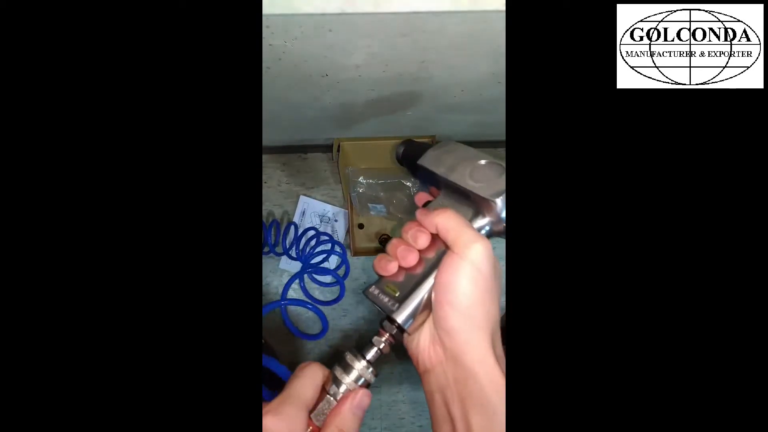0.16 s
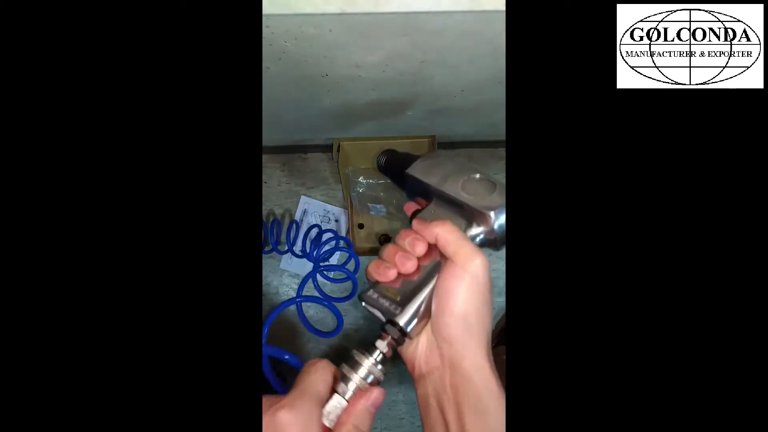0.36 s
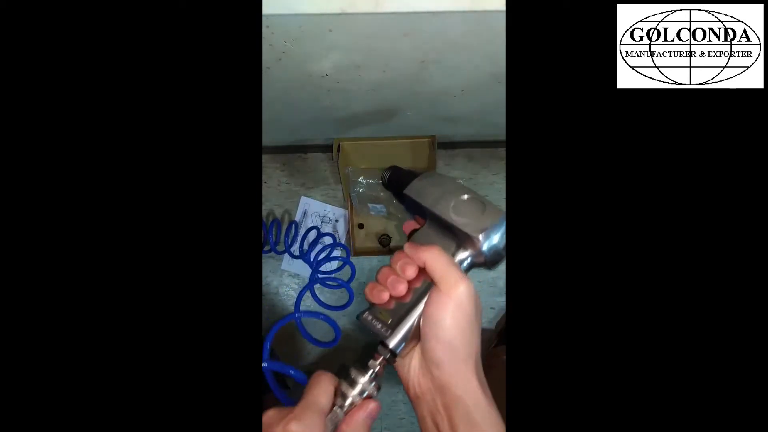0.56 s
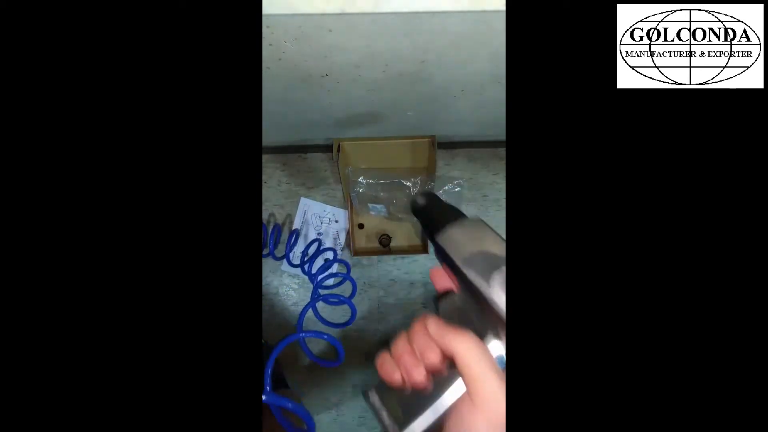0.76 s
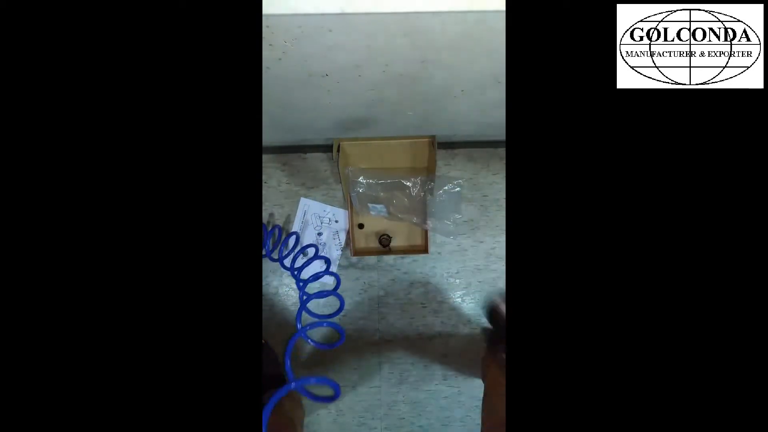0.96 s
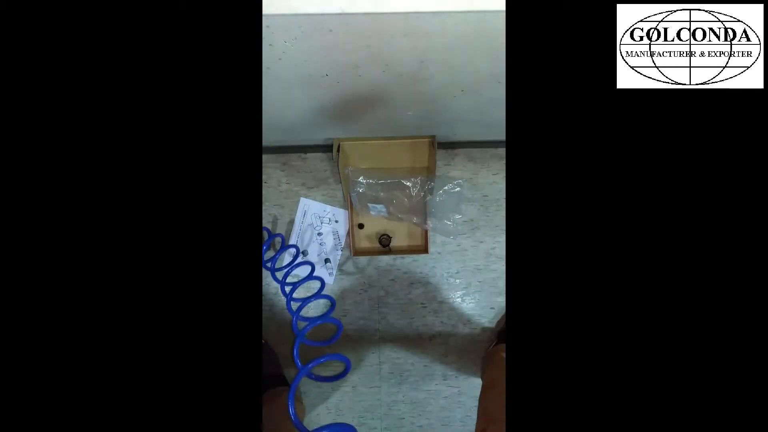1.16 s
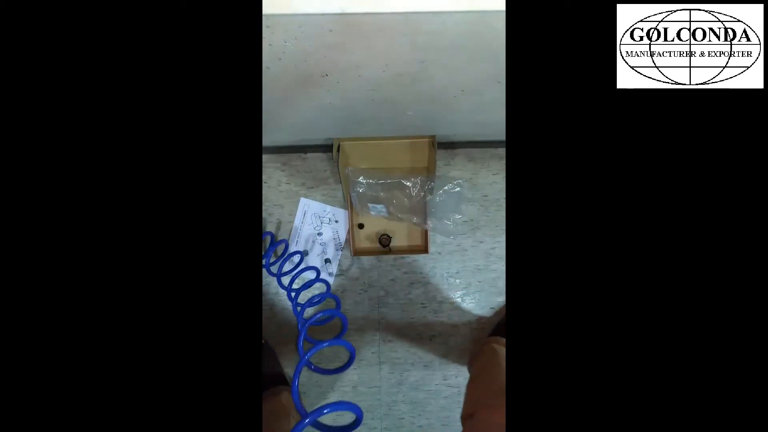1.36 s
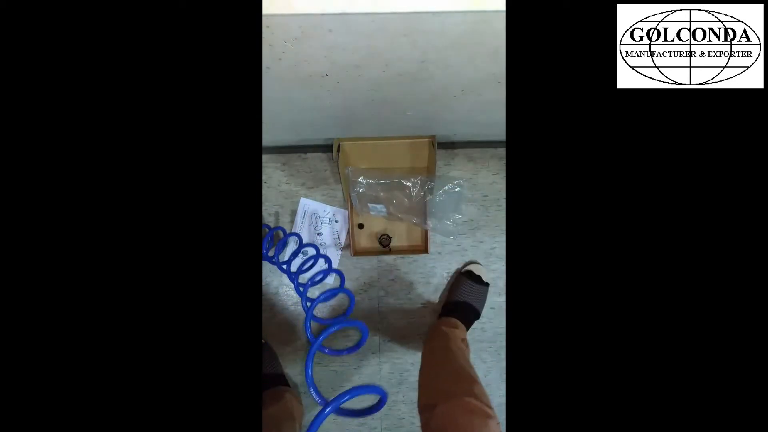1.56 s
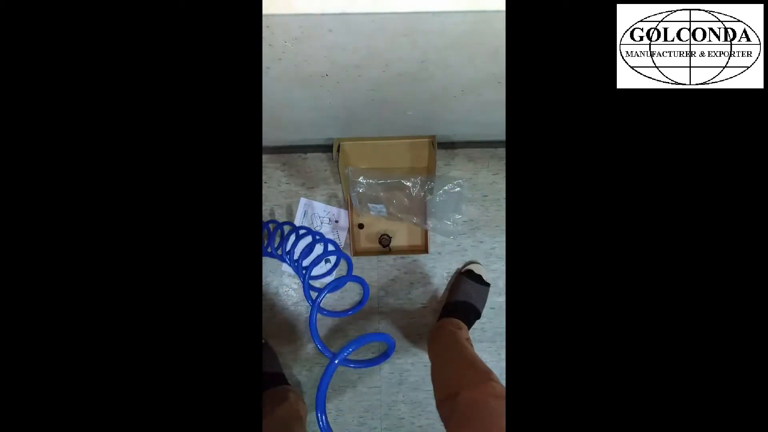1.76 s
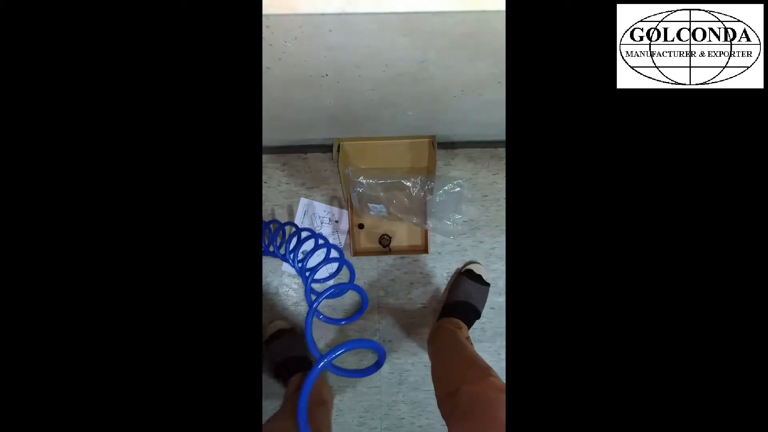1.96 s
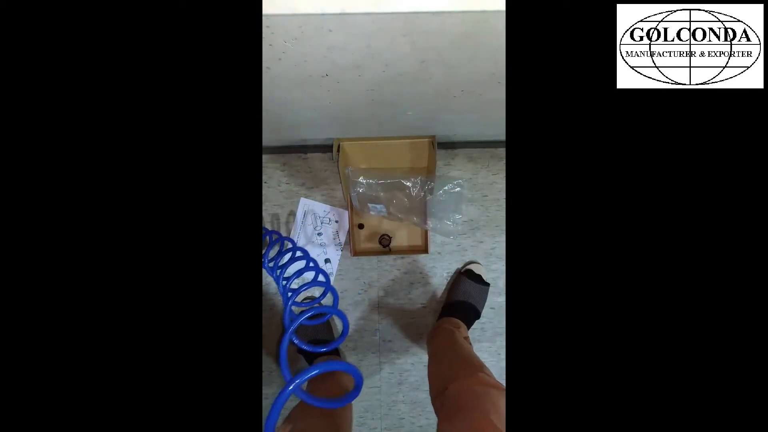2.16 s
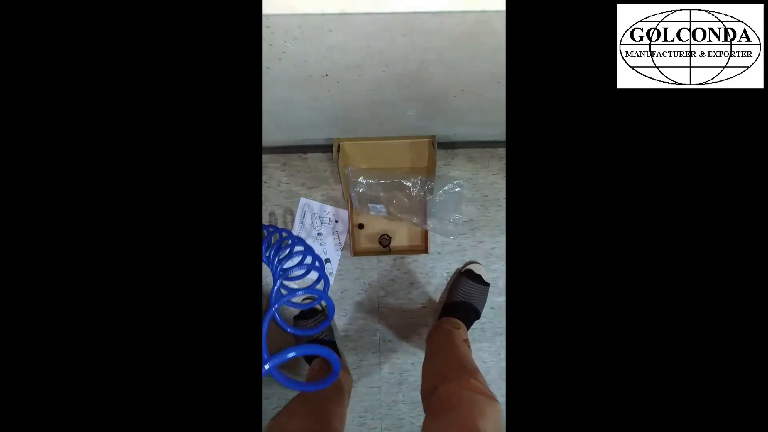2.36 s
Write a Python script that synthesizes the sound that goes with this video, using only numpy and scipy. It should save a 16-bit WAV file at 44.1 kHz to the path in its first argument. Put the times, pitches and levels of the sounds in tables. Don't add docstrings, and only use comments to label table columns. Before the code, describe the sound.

A short, harsh blast of compressed air escapes, cuts off, then tool knocks and light rattles

```python
import sys
import numpy as np
from scipy import signal
from scipy.fft import rfft, irfft, next_fast_len
from scipy.io import wavfile
from scipy.ndimage import uniform_filter1d, map_coordinates

SR = 44100
rng = np.random.default_rng(int(sys.argv[2]) if len(sys.argv) > 2 else 0)


def master(y):
    cut = np.clip(np.atleast_2d(y).T, -1, 1)
    pcm = np.round(cut * 32767)
    wavfile.write(sys.argv[1], SR, pcm.astype(np.int16))


def gain_from_decibels(decibels):
    exponent = np.asarray(decibels, float) / 20
    return 10 ** exponent


N = 105840
T = np.arange(N) / SR

# (time [s], left level [dB], right level [dB])
JET_FLOW = [
    (.205, -75, -94),
    (.216, -56, -30),
    (.237, -35, -19),
    (.252, -53, -12),
    (.3, -38, -16),
    (.341, -24, -13.5),
    (.349, -16.5, -30),
    (.385, -40, -42),
    (.52, -77, -61),
]
# (frequency [Hz], level [dB])
JET_COLOUR = [(300, -9), (1200, -17.5), (3000, -5), (5000, -4.5), (8200, 2), (10000, -1.5), (14000, 2.5),
              (16000, -9.5)]
# (frequency [Hz], gain [dB])
JET_SHADOW = [(300, -18), (1000, -12), (3000, -2.5), (6000, 6), (7500, -25), (14000, -14)]
# (time [s], level [dB])
PORT_WIND = [
    (.225, -58),
    (.25, -44),
    (.266, -15),
    (.3, -9.5),
    (.339, -11.5),
    (.343, -45),
]
# (frequency [Hz], level [dB])
BUFFET_COLOUR = [(25, 7), (90, -12), (250, -2.5), (550, 0), (1200, -6), (2500, -10), (5000, -8.5),
                 (9000, -14.5)]
# (time [s], frequency [Hz], decay t60 [s], left level [dB], right level [dB])
PRESSURE_SURGES = [
    (.2635, 97, 0.19, -60, -13),
    (.2655, 201, 0.24, -64, -15),
    (.3418, 58, 0.1, -41, -6),
    (.3385, 98, 0.064, -21.5, -45),
]
# (time [s], left level [dB], right level [dB])
LEAK_FLOW = [
    (.3, -99, -96),
    (.36, -68, -36),
    (.6, -82, -50),
    (1.1, -59, -44.5),
    (1.7, -49, -45.5),
    (2.45, -46, -43),
]
# (frequency [Hz], level [dB])
LEAK_COLOUR = [(1500, -22), (3000, -13.5), (5000, -9.5), (10000, -7), (12500, -8), (14200, -2),
               (15500, -3.5)]
# (time [s], left level [dB], right level [dB], brightness [dB per octave], hollow tone [dB])
TOOL_KNOCKS = [
    (.4052, -34, -17, 3.5, -13),
    (.42, -46, -38, -1, -10),
    (.621, -15, -9.5, -1, -0.5),
    (2.3489, -25.5, -23, -1, -16.5),
    (2.3633, -32, -34, -4, -12),
]
# (delay [s], level [dB])
KNOCK_CHATTER = [(0, -2), (.0004, -13), (.0011, -9), (.0017, -12), (.0027, -20.5)]
# (frequency [Hz], width [Hz], level [dB])
TOOL_BODY = [(890, 400, 0), (1905, 1090, -2), (3080, 1200, -0.5), (6560, 780, -1.5), (8280, 1140, -3),
             (10700, 1400, -5), (15200, 2100, -3.5)]
# (frequency [Hz], level [dB], decay t60 [s])
STEEL_MODES = [(3575, -12, 0.044), (4276, 1.5, 0.14), (4350, -10.5, 0.16), (6850, -31, 0.057),
               (9900, -14.5, 0.085)]
# (centre time [s], half length [s], left level [dB], right level [dB])
SCUFFS = [
    (.005, 0.055, -52, -53.5),
    (1.4, 0.035, -51, -46.5),
    (1.509, 0.051, -47, -42),
    (1.847, 0.041, -47, -43.5),
    (2.072, 0.039, -52.5, -47),
]
# (frequency [Hz], level [dB])
GRIT_COLOUR = [(1200, -12), (2000, -8), (2800, 0), (4500, -3.5), (7000, -2), (10000, -6.5), (14000, -32)]
# (start time [s], length [s], thud level [dB], creak level [dB])
SANDAL_STEPS = [
    (1.542, .007, -27, -37.5),
    (1.58, 0.013, -50, -42),
    (1.616, .03, -40, -46.5),
    (1.647, 0.03, -42, -67),
]
# (frequency [Hz], width [Hz], level [dB])
SOLE_BODY = [(161, 59, 0), (303, 170, -2)]
# (frequency [Hz], width [Hz], level [dB])
STRAP_BODY = [(1190, 280, 0)]
# (frequency [Hz], t60 [s])
ROOM_DECAY = [(200, 0.28), (2000, 0.28), (7000, 0.47), (14000, .25)]
# (frequency [Hz], density [dB per Hz])
RUMBLE_LEFT = [(30, -87), (60, -70), (120, -70.5), (230, -76), (450, -85.5), (800, -84), (2000, -97.5),
               (12000, -104)]
# (frequency [Hz], density [dB per Hz])
RUMBLE_RIGHT = [(30, -96), (60, -73.5), (120, -74), (230, -77.5), (450, -83.5), (800, -85.5), (2000, -95.5),
                (12000, -111), (16000, -116)]
# (frequency [Hz], correlation [0 to 1])
RUMBLE_ALIKE = [(60, 0.82), (300, 0.91), (640, 0.37), (1400, 0.11), (3000, .01)]
# (frequency [Hz], width [Hz], level [dB])
MACHINE_HUM = [(681.3, 2.6, -68.5), (706, 5.4, -67)]
# (frequency [Hz], shift [standard deviations])
GAP_LEFT_SHIFT = [(4000, .6), (8000, .1), (10000, -.9), (12000, .1), (14500, .1), (15500, -1.5)]
# (frequency [Hz], gain [dB])
LEFT_MIC = [(7500, 0.5), (8800, -5.5), (10000, -24), (11500, -6.5), (14000, -8), (15300, -28), (15900, -46)]


def unit(x):
    return x / np.sqrt(np.mean(x ** 2, axis=-1, keepdims=True) + 1e-20)


def along(points, hz):
    f, v = np.transpose(points)
    return np.interp(np.log(hz + 1), np.log(f + 1), v)


def gains(rows):
    s, *columns = np.transpose(rows)
    return gain_from_decibels(np.array([np.interp(T, s, c, left=-150, right=-150) for c in columns]))


def wobble(rate):
    return map_coordinates(rng.standard_normal(int(N * rate / SR) + 4), [T * rate])


def filtered(x, response):
    m = next_fast_len(N + SR // 2)
    return irfft(rfft(x, m) * response(np.fft.rfftfreq(m, 1 / SR)), m)[..., :N]


def noise(colour, channels=2):
    white = rng.standard_normal((channels, N))
    return unit(filtered(white, lambda hz: gain_from_decibels(along([(19, -86)] + colour, hz))))


def body(peaks):
    def response(f):
        total = 0
        for k, (centre, width, db) in enumerate(peaks):
            damping = 1j * f * width
            total = total + (-1) ** k * gain_from_decibels(db) * damping / (centre * centre - f * f + damping)
        return total
    return response


def after(s, t60):
    return (T >= s) * gain_from_decibels(-60 * np.abs(T - s) / t60)


def jet():
    hiss = noise(JET_COLOUR) * gain_from_decibels(0.95 * wobble(120.9))
    hiss[0] = filtered(hiss[0], lambda hz: gain_from_decibels(along(JET_SHADOW, hz)))
    throat_hz, throat_width_hz, whistle_db = 1287, 15.5, -10.5
    throat = body([(throat_hz, throat_width_hz, 0)])
    whistle = unit(filtered(rng.standard_normal(N), throat))
    flow = gains(JET_FLOW)
    return flow * hiss + gain_from_decibels(whistle_db) * flow[0] * whistle


def buffet():
    slaps_per_s, slap_db, left_db = 700, 6, -34
    slaps = noise(BUFFET_COLOUR, channels=1)[0] * gain_from_decibels(slap_db * wobble(slaps_per_s))
    return unit(slaps) * gains(PORT_WIND)[0] * gain_from_decibels([[left_db], [0]])


def valve_slam():
    sag_s, sag_turns = 0.003, 0.11
    out = np.zeros((2, N))
    for s, hz, t60, left_db, right_db in PRESSURE_SURGES:
        sag = sag_turns * (1 - np.exp(-np.abs(T - s) / sag_s))
        ring = after(s, t60) * np.sin(2 * np.pi * (hz * (T - s) + sag))
        out += gain_from_decibels([[left_db], [right_db]]) * [[1], [-1]] * ring
    return out


def leak():
    return gains(LEAK_FLOW) * noise(LEAK_COLOUR) * gain_from_decibels(.8 * wobble(6.09))


def knocks():
    rattle_s, rattle_db = 0.16, -33.5
    crack_s, crack_db = .012, 22
    left_lag_s, left_extra_tilt_db = .0007, 1
    out = np.zeros((2, N))
    for s, left_db, right_db, tilt_db, hollow_db in TOOL_KNOCKS:
        rattle = after(s, rattle_s) + gain_from_decibels(crack_db) * after(s, crack_s)
        blow = gain_from_decibels(rattle_db) * rng.standard_normal((2, N)) * rattle
        signs = rng.choice([-1, 1], size=len(KNOCK_CHATTER))
        for (late, db), sign in zip(KNOCK_CHATTER, signs):
            blow[0, round((s + late + left_lag_s) * SR)] += sign * gain_from_decibels(db)
            blow[1, round((s + late) * SR)] += sign * gain_from_decibels(db)
        slopes = np.array([[tilt_db + left_extra_tilt_db], [tilt_db]])
        hollow = np.add(TOOL_BODY[0], (0, 0, hollow_db / 2))
        tool = body([hollow] + TOOL_BODY[1:])
        struck = filtered(blow, lambda f: tool(f) ** 2 * gain_from_decibels(slopes * np.log2((f + 50) / 3000)))
        out += gain_from_decibels([[left_db + 20.5], [right_db + 22.5]]) * struck
    return out


def clink():
    start_s, left_db, right_db = 2.3498, -28.5, -22.5
    ring = np.zeros(N)
    for hz, db, t60 in STEEL_MODES:
        ring += gain_from_decibels(db) * after(start_s, t60) * np.sin(2 * np.pi * hz * (T - start_s))
    return gain_from_decibels([[left_db], [right_db]]) * ring


def sandals():
    slide, thud_gain, creak_gain = np.zeros((2, N)), np.zeros(N), np.zeros(N)
    for s, half, left_db, right_db in SCUFFS:
        slide += gain_from_decibels([[left_db], [right_db]]) * np.exp(-((T - s) / half) ** 2)
    for s, length, thud_db, creak_db in SANDAL_STEPS:
        bump = np.exp(-((T - s - length / 2) / (length / 2)) ** 2)
        thud_gain += gain_from_decibels(thud_db) * bump
        creak_gain += gain_from_decibels(creak_db) * bump
    scuff = slide * noise(GRIT_COLOUR) * gain_from_decibels(2.14 * wobble(170))
    thud = unit(filtered(rng.standard_normal(N), body(SOLE_BODY))) * thud_gain
    creak = unit(filtered(rng.standard_normal(N), lambda f: body(STRAP_BODY)(f) ** 2)) * creak_gain
    step_right_db = -17
    return scuff + (thud + creak) * gain_from_decibels([[0], [step_right_db]])


def room(x):
    hz, t, z = signal.stft(rng.standard_normal((2, SR // 2)), SR, nperseg=256)
    decay = gain_from_decibels(-60 * t / along(ROOM_DECAY, hz)[:, None])
    tail = signal.istft(z * decay, SR, nperseg=256)[1]
    tail = tail / np.linalg.norm(tail[0])
    late = np.pad(x, (200, 0))
    return signal.fftconvolve(late[None], tail, axes=1)[:, :N]


def room_rumble():
    def turn(hz):
        return np.arccos(np.clip(along(RUMBLE_ALIKE, hz), -1, 1)) / 2

    def level(hz):
        curves = [along([(8, -130)] + floor, hz) for floor in (RUMBLE_LEFT, RUMBLE_RIGHT)]
        return gain_from_decibels(curves) * np.sqrt(SR / 2)

    white = rng.standard_normal((2, N))
    mid, side = filtered(white, lambda hz: np.array([np.cos(turn(hz)), np.sin(turn(hz))]))
    return filtered(np.array([mid + side, mid - side]), level) * gain_from_decibels(wobble(4.41))


def machine_hum():
    steady_db, drift_rad, grows_db = -58.5, .7, 7.5
    hum = gain_from_decibels(steady_db) * np.sin(2 * np.pi * MACHINE_HUM[0][0] * T + drift_rad * wobble(4.89))
    for hz, width, db in MACHINE_HUM:
        resonance = body([(hz, width, 0)])
        hum += gain_from_decibels(db) * unit(filtered(rng.standard_normal(N), lambda f: resonance(f) ** 2))
    return hum * gain_from_decibels(grows_db * (T / T[-1] - .5))


def thin_treble(x):
    from_hz, bins, spread, thin_db = 2800, 8, .2, -5
    rarity_left, rarity_right = 1.2, 1.5
    hz, _, z = signal.stft(x, SR, window="cosine", nperseg=1024)
    power = np.abs(z[:, :-1]) ** 2 + 1e-20
    band = power.reshape(2, -1, bins, power.shape[2]).mean(axis=2)
    luck = unit(uniform_filter1d(rng.standard_normal(band.shape), size=5, axis=2))
    band_hz = hz[:-1:bins]
    rarity = np.array([rarity_left + along(GAP_LEFT_SHIFT, band_hz), rarity_right + 0 * band_hz])
    keep = np.repeat(np.clip((luck + rarity[..., None]) / spread, 0, 1), bins, axis=1)
    keep = keep * power / (power + gain_from_decibels(2 * thin_db) * np.repeat(band, bins, axis=1))
    keep = np.where(hz[:-1, None] < from_hz, 1, keep)
    keep = np.pad(keep, ((0, 0), (0, 1), (0, 0)))
    return signal.istft(z * keep, SR, window="cosine", nperseg=1024)[1][:, :N]


def scene():
    blast, hits, steel, feet = jet(), knocks(), clink(), sandals()
    wet = gain_from_decibels(-10.5) * room(blast[1])
    wet = wet + room(gain_from_decibels(-12) * hits[1] + gain_from_decibels(-9) * feet[0] + gain_from_decibels(-30) * steel[1])
    near = blast + buffet() + valve_slam() + leak() + hits + steel + feet
    return near + wet + room_rumble() + machine_hum()


def roll_off(x):
    return signal.sosfilt(signal.butter(12, 16970, fs=SR, output="sos"), x)


def record(dry):
    top_hz = 15900
    x = filtered(dry, lambda hz: gain_from_decibels([along(LEFT_MIC, hz), 0 * hz]) * (hz < top_hz))
    x = x / (1 + np.abs(x) ** 6) ** (1 / 6)
    mix = thin_treble(x)
    return roll_off(mix)


dry = scene()
out = record(dry)
master(out)
```